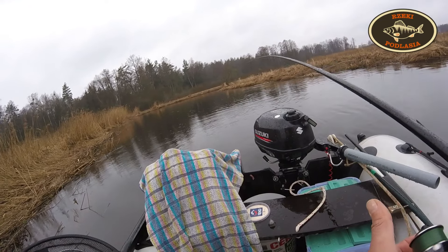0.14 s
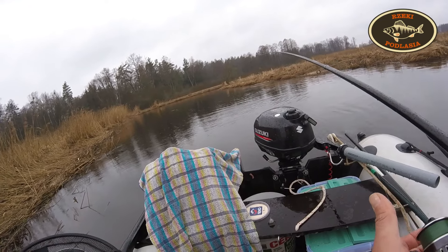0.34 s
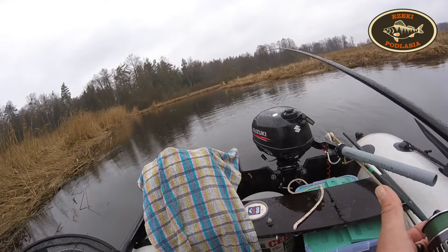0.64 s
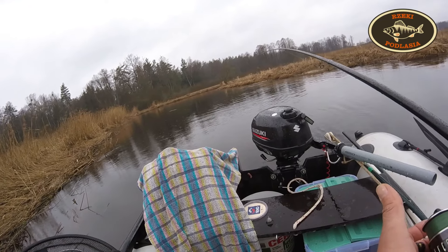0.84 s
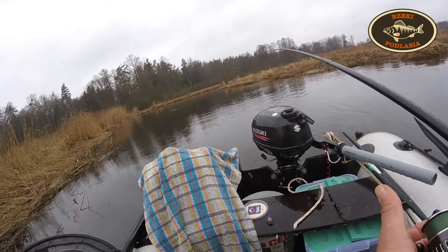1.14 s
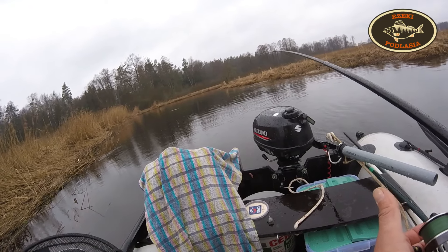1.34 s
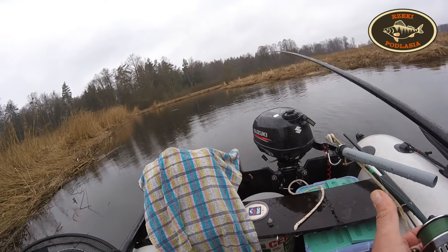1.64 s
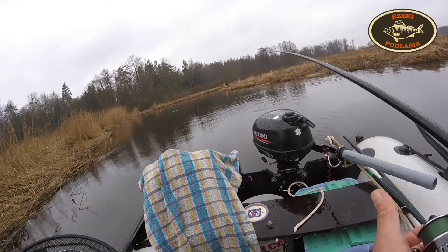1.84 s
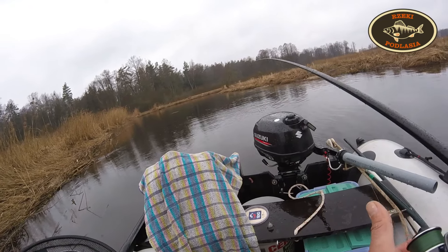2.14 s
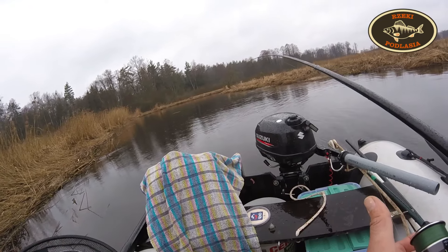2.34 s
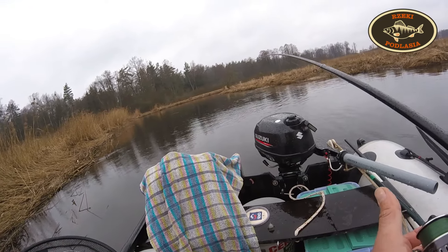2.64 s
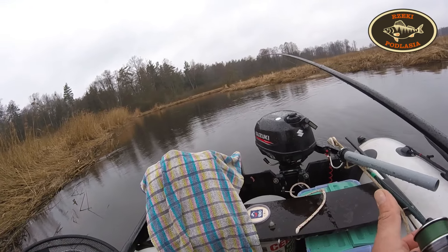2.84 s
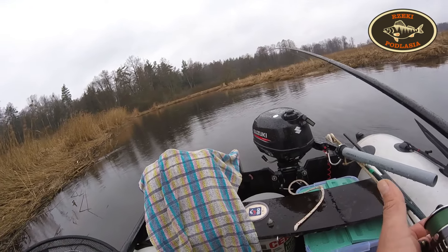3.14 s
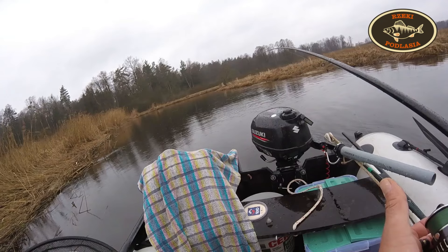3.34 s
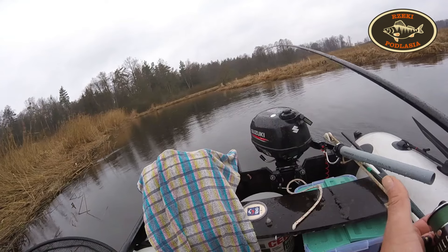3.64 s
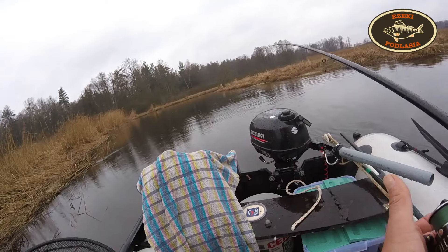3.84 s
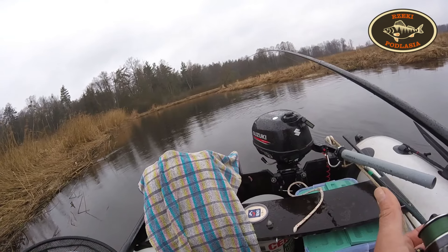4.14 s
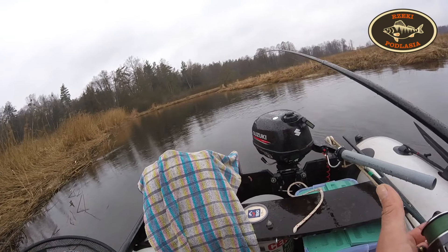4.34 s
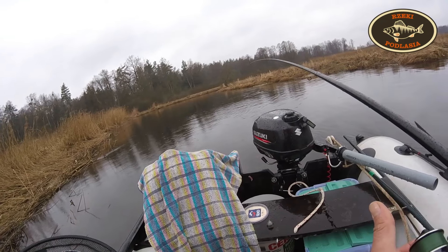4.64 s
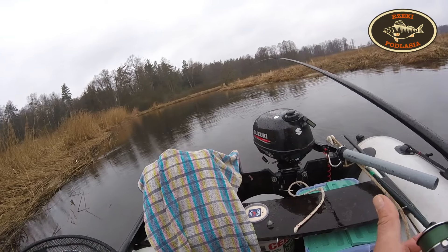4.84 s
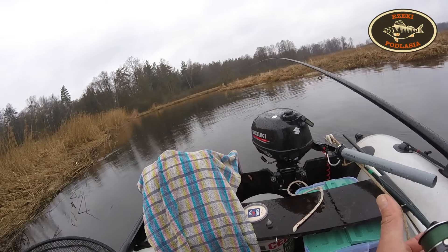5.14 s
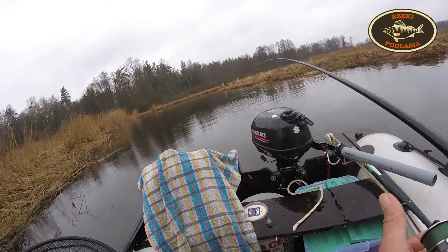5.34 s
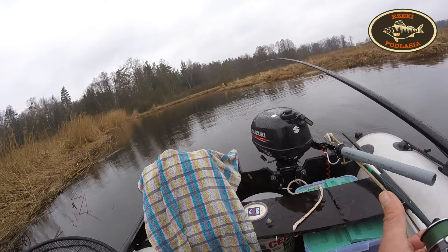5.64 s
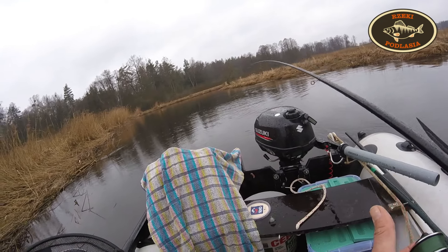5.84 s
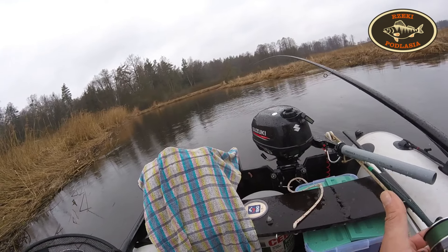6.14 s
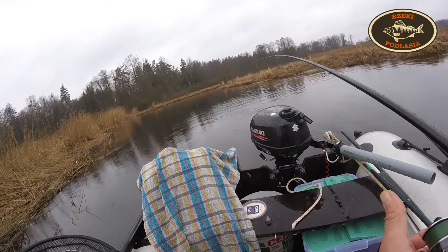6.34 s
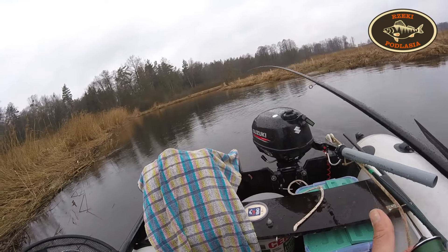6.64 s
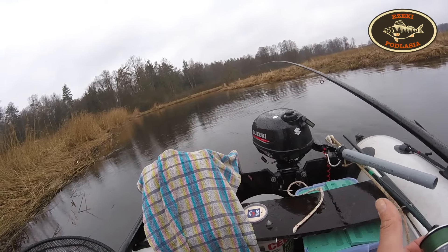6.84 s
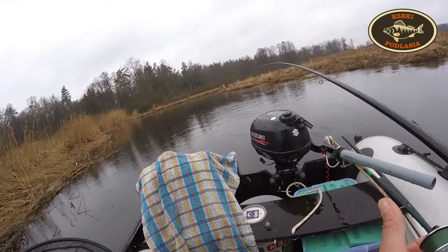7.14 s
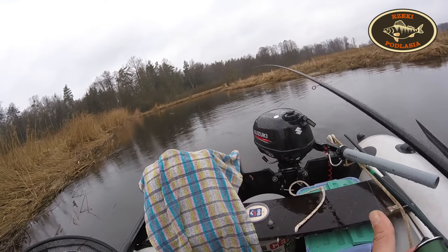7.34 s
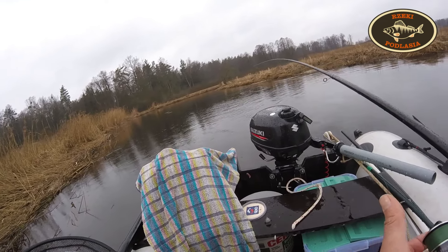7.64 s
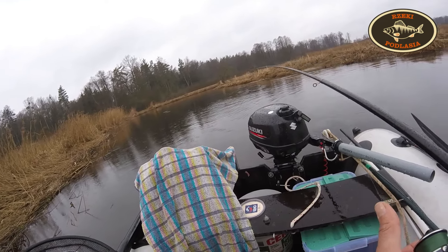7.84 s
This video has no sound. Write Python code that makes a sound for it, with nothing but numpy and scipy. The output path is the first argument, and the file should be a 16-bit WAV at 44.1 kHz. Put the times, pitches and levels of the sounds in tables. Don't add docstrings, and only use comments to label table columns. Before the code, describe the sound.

Outdoors on a quiet river, heard very close to a fishing reel, over smooth faint hiss and low, uneven wind buffeting. At 0.2 seconds the drag slips slowly for under two tenths, a short ratchet of bright metallic clicks. Near-quiet follows, with light puffs and faint taps, until a quick high zip at 2.1 and a longer surging run from 2.8 to 3.15, rising to a fast buzz before slowing. Gentler slips come at 4.2 and 4.7, with a strong wind thump around 4.4. At 5.8 a burst starts fast and trails off; at 6.7 another rises and falls evenly; the last is at 7.3 to 7.5. Each carries washer hiss and a nasal, wavering hum of line rubbing in the rod. Between bursts are soft line rasps, small dry ticks and taps. Wind rumbles most around 7 and from 7.4 to 7.8.

```python
import sys
import numpy as np
from scipy import signal
from scipy.fft import rfft, irfft, next_fast_len
from scipy.io import wavfile
from scipy.ndimage import uniform_filter1d, map_coordinates

SR = 44100
rng = np.random.default_rng(int(sys.argv[2]) if len(sys.argv) > 2 else 0)


def log_audio(samples):
    frames = np.atleast_2d(samples).T
    limited = np.clip(frames, -1, 1)
    pcm = np.round(limited * 32767).astype(np.int16)
    wavfile.write(sys.argv[1], SR, pcm)


def rack_gain(trim_db):
    fader = np.asarray(trim_db, float)
    return 10 ** (fader / 20)


N = 352359
T = np.arange(N) / SR

# (time [s], tooth rate [teeth/s])
SPOOL_SLIPS = [
    [(0.1923, 0.1), (0.2168, 83.4), (0.2578, 186.1), (0.2962, 163.4), (0.3359, 78.6)],
    [(2.0973, 0.3), (2.1085, 97.8), (2.1395, 333.3), (2.1629, 391.8), (2.1927, 301.0), (2.2179, 101.0)],
    [(2.7934, 1.2), (2.803, 89.4), (2.8494, 232.6), (2.9263, 225.2), (2.9888, 423.3), (3.0416, 340.2),
     (3.0949, 205.5), (3.1471, 124.1)],
    [(4.1708, 19.2), (4.202, 106.1), (4.2048, 121.4), (4.2317, 144.4), (4.2597, 85.2)],
    [(4.6598, 0.0), (4.6802, 72.3), (4.7466, 121.9), (4.7715, 105.7), (4.7831, 72.8)],
    [(5.7759, 0.0), (5.7879, 35.0), (5.8039, 120.0), (5.8431, 314.6), (5.9139, 221.8), (5.9636, 164.5),
     (5.9912, 95.5)],
    [(6.6664, 33.2), (6.694, 124.9), (6.732, 201.2), (6.7694, 221.7), (6.804, 187.6), (6.855, 35.6)],
    [(7.3309, 69.0), (7.3611, 160.2), (7.4007, 218.6), (7.4294, 231.8), (7.4723, 157.4), (7.499, 88.6)],
]
# (spring click [dB], line rub [dB])
SLIP_STRENGTH = [(-37.5, -42.5), (-37, -36.5), (-35.5, -36.5), (-37, -36), (-36.5, -39.5), (-35.5, -38.5),
                 (-35, -36), (-36, -37)]
# (bumps per tooth [1], level over the rub [dB])
BRAID_WEAVE = [(6.8, 11), (5.3, 4), (6.01, 3), (6.01, 3), (7.5, 3), (5.9, 3), (6.9, 6), (6.9, 5)]
# (frequency [Hz], width [Hz], level [dB])
SPOOL_MODES = [(2020, 76, -11.5), (3290, 1100, -16.5), (4196, 386, -6), (4697, 137, 4.5), (5180, 270, -8),
               (6700, 480, -1.5), (7260, 220, -2), (7190, 430, -9.5), (8260, 570, -4.5), (10040, 2700, -18),
               (10800, 720, -14.5), (12000, 280, -9), (13030, 114, -3.5), (14060, 165, -7)]
# (frequency [Hz], density [dB/Hz])
WASHER_SPECTRUM = [(1200, -5.5), (1500, -2), (2150, -2), (2450, -7.5), (3000, 0.5), (3700, -8.5),
                   (6000, -22), (14000, -42.5)]
# (frequency [Hz], width [Hz], level [dB])
BLANK_MODES = [(487, 315, -4.5), (616, 77, 5.5), (759, 99, 2), (994, 47, 0.5), (1133, 83, -1)]
# (time [s], length [s], level [dB])
LINE_PULLS = [(0.0, 0.035, -49.5), (1.563, 0.41, -61.5), (2.035, 0.14, -45.5), (2.234, 0.043, -57),
              (2.48, 0.22, -56.5), (3.939, 0.11, -48.5), (4.11, 0.063, -59), (4.492, 0.067, -50.5),
              (5.638, 0.038, -56), (5.681, 0.27, -44), (6.07, 0.025, -50), (6.5, 0.033, -55),
              (6.528, 0.085, -45.5), (6.86, 0.32, -56), (7.169, 0.068, -48.5), (7.52, 0.17, -60),
              (7.724, 0.11, -50.5), (7.947, 0.011, -44.5)]
# (time [s], peak level [dB])
LINE_TAPS = [(0.483, -49.5), (0.901, -50), (2.46, -47), (3.916, -46), (4.305, -41), (5.642, -50),
             (5.687, -45), (6.054, -47), (6.491, -47), (6.539, -41), (7.119, -52), (7.715, -47)]
# (time [s], peak level [dB], frequency [Hz])
TACKLE_TICKS = [(2.2593, -48, 2760), (2.461, -54, 3730), (3.978, -48, 2610), (4.305, -46, 2320),
                (4.9252, -56, 2060), (5.097, -52.5, 6230), (6.261, -54, 2540), (6.5187, -48.5, 3700),
                (7.12, -52, 2460), (7.1831, -52, 3380), (7.5654, -53, 2200)]
# (time [s], buffet level [dB])
WIND_LEVEL = [(0.0, -44), (0.06, -50.5), (1.09, -51.5), (1.91, -44.5), (2.02, -53), (2.71, -48.5),
              (2.76, -52.5), (4.56, -52.5), (4.63, -44), (4.98, -51.5), (6.99, -38.5), (7.32, -51),
              (7.39, -41), (7.52, -41.5), (7.56, -38), (7.72, -42.5), (7.79, -37), (7.99, -51.5)]
# (time [s], level over the wind [dB])
WIND_PUFFS = [
    (.96, 3),
    (1.29, 3),
    (1.8, 2),
    (2.68, 7),
    (4.38, 11.5),
    (5.1, 3),
    (6.3, 6.5),
    (6.83, 0.5),
    (7.02, 3.5),
]
# (frequency [Hz], density [dB/Hz])
BUFFET_SPECTRUM = [(5.9, -44), (10, 17), (21, -7), (33, 3), (97, -7.5), (129, -25), (162, -14), (200, -37),
                   (260, -61.5), (440, -120)]
# (frequency [Hz], density [dB/Hz])
ROAR_SPECTRUM = [(65, -5.5), (110, 3), (128, -4.5), (156, -5.5), (269, -6), (424, -14.5), (686, -18),
                 (1100, -31), (1430, -65), (2420, -120)]
# (frequency [Hz], density [dB/Hz])
HISS_SPECTRUM = [(180, -51.5), (300, -5), (342, -12), (685, -12), (1020, -18.5), (1620, -20.5),
                 (4500, -26.5), (7500, -32.5), (10000, -37.5), (13000, -42.5), (15500, -59)]
# (frequency [Hz], rms level [dB])
WHINE_LINES = [(7780, -99), (9590, -101), (9652, -94), (12963, -102)]

SLOWEST, USUAL = 20, 190
SNAP_DB_PER_OCTAVE, SNAP_FADE_DB_PER_S = 2, 1.5
WAIT_DB_PER_S, LONGEST_WAIT_S, LAST_DB = 150, 0.022, -3
DULL_DB_PER_OCTAVE, DULL_ABOVE_HZ = 1, 6000
GRAB_SPEED, GRAB_DB = 107, 18.5
SKIM_DB, TIRE_DB_PER_S = -8.5, 1.5
RUB_REST_DB, RUB_ATTACK_S, RUB_RELEASE_S = -68.5, 0.025, 0.02
PUFF_S = 0.042
CALM_DB, ROAR_DB, ROAR_FOLLOWS = -46.5, -54.5, 0.46
HISS_DB = -62.5


def spool():
    speed, teeth = np.zeros(N), []
    for slip in SPOOL_SLIPS:
        s, rate = np.transpose(slip)
        now = np.interp(T, s, rate, left=0, right=0)
        speed += now
        passed = np.flatnonzero(np.diff(np.floor(np.cumsum(now) / SR)))
        teeth += [round(s[0] * SR), *passed]
    return speed, np.array(teeth)


def click_force_db(speed, teeth):
    s = teeth / SR
    octaves = np.log2(speed[teeth].clip(SLOWEST) / USUAL)
    force_db = np.transpose(SLIP_STRENGTH)[0][slip_at(s)] + SNAP_DB_PER_OCTAVE * octaves
    force_db = force_db - SNAP_FADE_DB_PER_S * since_start(s)
    wait_s = np.diff(teeth, prepend=0) / SR
    last = np.roll(wait_s, -1) > 0.1
    return force_db + WAIT_DB_PER_S * wait_s.clip(0, LONGEST_WAIT_S) + LAST_DB * last


def drag(speed, teeth, size_db=0.68, mode_db=1.8, jitter_s=0.00006):
    t = np.arange(800) / SR
    luck = rng.standard_normal((len(teeth), len(SPOOL_MODES) + 2))
    at = teeth + np.round(jitter_s * SR * luck[:, 0] - 0.0003 * SR).astype(int)
    force_db = click_force_db(speed, teeth) + size_db * luck[:, 1]
    dull_db = DULL_DB_PER_OCTAVE * np.log2(speed[teeth].clip(SLOWEST) / 300)
    shade_db = mode_db * drift(luck[:, 2:], 0.4)
    rise = 1 - np.exp(-t / 0.00035)
    scrape = rise * np.exp(-(t / 0.0013) ** 2)
    chatter = rack_gain(-8 - 60 * t / 0.022)
    grit = drift(rng.standard_normal((len(teeth), len(t))), 0.85)
    contact = grit * (scrape + chatter)
    where = (at[:, None] + np.arange(len(t))).ravel()
    out = np.zeros(N)
    for k, (hz, width_hz, db) in enumerate(SPOOL_MODES):
        caught = np.abs(contact @ np.exp(-(2j * np.pi * hz + np.pi * width_hz) * t))
        even = (unit(caught) + 0.4) ** -0.8
        mode_level_db = force_db + db + 15.5 + shade_db[:, k] - dull_db * (hz > DULL_ABOVE_HZ)
        gain = even * rack_gain(mode_level_db)
        push = np.bincount(where, (gain[:, None] * contact).ravel(), N)
        out += (-1) ** k * filtered(push, mode(hz, width_hz))
    return out


def washers(speed, level_db=-56, rise=0.47):
    turning = uniform_filter1d(speed, 500).clip(0) / 200
    return rack_gain(level_db + 2.4 * wobble(90)) * turning ** rise * noise(WASHER_SPECTRUM)


def blank(f):
    modes = sum((-1) ** k * rack_gain(db) * mode(hz, width)(f) for k, (hz, width, db) in enumerate(BLANK_MODES))
    return modes / (1 + (f / 1260) ** 16)


def friction(speed):
    off = np.log2(speed.clip(1) / GRAB_SPEED)
    loss_db = -GRAB_DB * off ** 2
    loss_db = np.where(off > 0, np.maximum(loss_db, SKIM_DB), loss_db)
    rub_db = np.transpose(SLIP_STRENGTH)[1][slip_at(T)]
    gain = (speed > 0) * rack_gain(rub_db + loss_db - TIRE_DB_PER_S * since_start(T))
    for s, length, db in LINE_PULLS:
        gain = gain + rack_gain(db) * (T >= s) * (T < s + length)
    keep = np.exp(-1 / (RUB_RELEASE_S * SR))
    held = np.maximum(gain, signal.lfilter([1 - keep], [1, -keep], gain))
    return uniform_filter1d(held, 1 + int(RUB_ATTACK_S * SR)) + rack_gain(RUB_REST_DB)


def rod(speed, teeth, unsteady=0.0054, jolt_db=24):
    bumps, weave_db = np.transpose(BRAID_WEAVE)[:, slip_at(T)]
    turning = uniform_filter1d(1. * (speed > 0), 600)
    line_speed = np.roll(uniform_filter1d(speed, 900), 350)
    weave_hz = bumps * line_speed
    bite = np.clip(weave_hz / 1100, 0, 1) ** 3
    phase = 2 * np.pi * np.cumsum(weave_hz * (1 + unsteady * wobble(150))) / SR
    weave = bite * np.sin(phase)
    jolts = np.bincount(teeth, minlength=N)
    rasp = rack_gain(1.33 * wobble(45) - 0.74 * turning) * rng.standard_normal(N)
    singing = filtered(rack_gain(weave_db) * weave + rack_gain(jolt_db) * jolts, blank)
    rub = unit(filtered(rasp, blank)) + singing
    taps = np.zeros(N)
    for s, db in LINE_TAPS:
        taps[round(s * SR)] = rack_gain(db + 33)
    return rack_gain(-7.5) * friction(speed) * rub + filtered(taps, blank)


def creaks():
    out, t = np.zeros(N), np.arange(300) / SR
    for s, db, hz in TACKLE_TICKS:
        ring = np.sin(2 * np.pi * hz * t) + 0.17 * rng.standard_normal(len(t))
        out[round(s * SR):][:len(t)] += rack_gain(db + 2.5 - 60 * t / 0.004) * ring
    return out


def banks(x, level_db=-29, t60=0.53):
    t = np.arange(SR // 2) / SR
    tail = (1 - np.exp(-t / 0.055)) * rack_gain(-60 * t / t60) * rng.standard_normal(len(t))
    wash = signal.fftconvolve(x, tail / np.linalg.norm(tail))[:N]
    return rack_gain(level_db) * filtered(wash, lambda f: mode(5800, 4500)(f) ** 2)


def wind():
    buffet_db, = curves(WIND_LEVEL)
    for s, db in WIND_PUFFS:
        buffet_db = buffet_db + db * np.exp(-((T - s) / PUFF_S) ** 2)
    roar_db = ROAR_DB + ROAR_FOLLOWS * (buffet_db - CALM_DB) + 2.1 * wobble(9)
    buffet = rack_gain(buffet_db + 5.06 + 2.35 * wobble(7)) * noise(BUFFET_SPECTRUM)
    return buffet + rack_gain(roar_db) * noise(ROAR_SPECTRUM)


def river_hiss():
    return rack_gain(HISS_DB + 0.4 * wobble(3)) * noise(HISS_SPECTRUM)


def whine():
    out = np.zeros(N)
    for hz, db in WHINE_LINES:
        out += np.sqrt(2) * rack_gain(db) * np.sin(2 * np.pi * hz * T + 0.6 * wobble(22))
    return out


def slip_at(s):
    return np.searchsorted([rows[-1][0] + 0.1 for rows in SPOOL_SLIPS[:-1]], s)


def since_start(s):
    starts = np.array([rows[0][0] for rows in SPOOL_SLIPS])
    return (s - starts[slip_at(s)]).clip(0)


def unit(x):
    return x / np.sqrt(np.mean(x ** 2) + 1e-20)


def curves(rows):
    s, *cols = np.transpose(rows)
    return [np.interp(T, s, c) for c in cols]


def wobble(rate):
    return map_coordinates(rng.standard_normal(int(N * rate / SR) + 4), [T * rate])


def drift(values, alike):
    return signal.lfilter([np.sqrt(1 - alike ** 2)], [1, -alike], values, axis=0, zi=alike * values[:1])[0]


def filtered(x, response):
    m = next_fast_len(N + 8192)
    return irfft(rfft(x, m) * response(np.fft.rfftfreq(m, 1 / SR)), m)[..., :N]


def mode(hz, width_hz):
    return lambda f: 1j * f * width_hz / (hz * hz - f * f + 1j * f * width_hz)


def noise(spectrum):
    hz, db = np.transpose(spectrum)
    shape = lambda f: rack_gain(np.interp(np.log(f + 1), np.log(hz + 1), db))
    return unit(filtered(rng.standard_normal(N), shape))


def scene():
    speed, teeth = spool()
    reel = drag(speed, teeth) + washers(speed)
    tackle = rod(speed, teeth) + creaks()
    background = wind() + river_hiss() + whine()
    return (reel + banks(reel) + tackle + background)[None]


def roll_off(x):
    return signal.sosfilt(signal.butter(12, 15820, fs=SR, output="sos"), x)


def record(dry):
    heard = filtered(dry, lambda f: 1 / (1 + (f / 14500) ** 34))
    return roll_off(heard)


dry = scene()
out = record(dry)
log_audio(out)
```